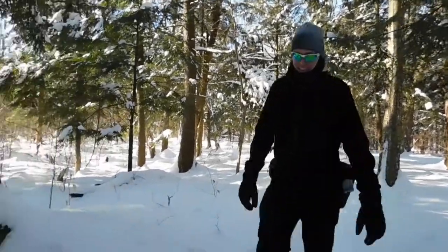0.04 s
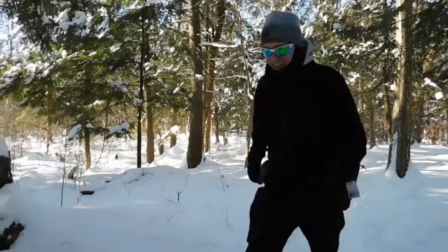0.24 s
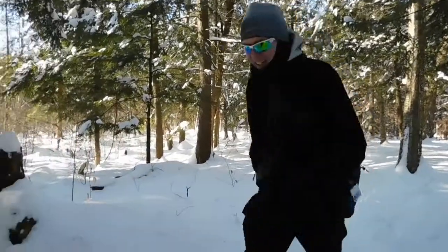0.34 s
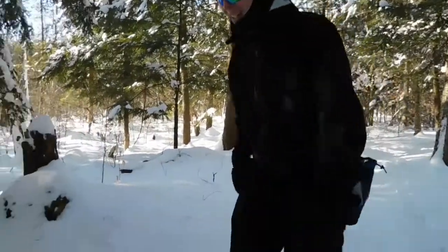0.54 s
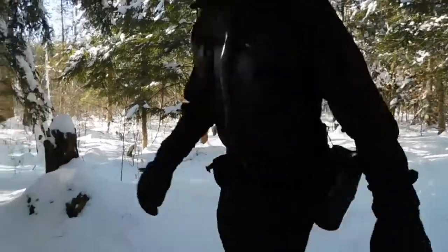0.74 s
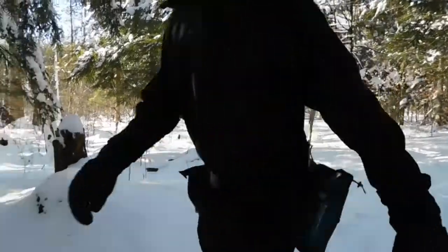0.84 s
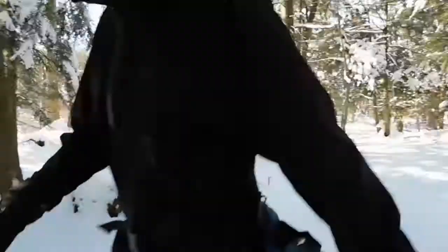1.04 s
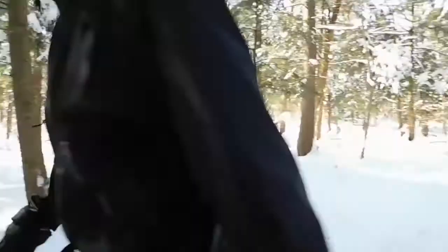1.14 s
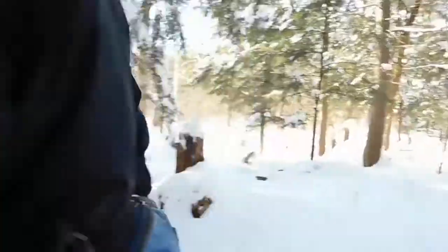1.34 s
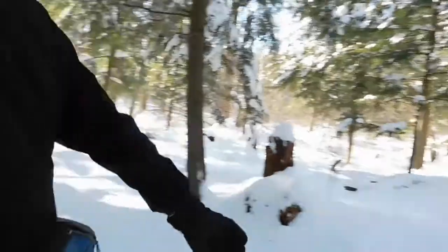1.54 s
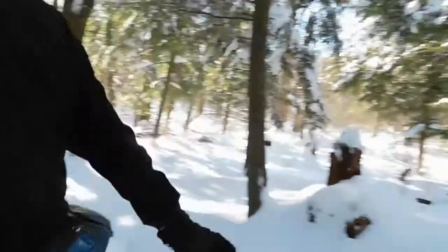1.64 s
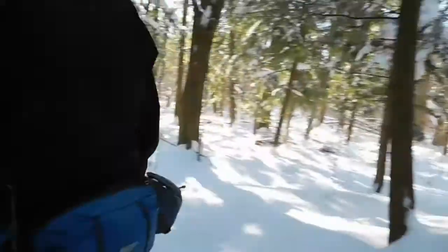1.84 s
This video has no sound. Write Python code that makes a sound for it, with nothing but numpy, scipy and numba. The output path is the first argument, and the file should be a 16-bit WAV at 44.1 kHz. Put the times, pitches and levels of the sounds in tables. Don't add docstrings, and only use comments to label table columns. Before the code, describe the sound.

Snow footsteps in a quiet outdoor forest, near and dry: dense icy crackle with hollow creaks, lumps cracking and crisp crust snaps, a brief pause between the first two bursts, then scattered crunching that fades away.

```python
import sys
import numpy as np
from scipy import signal
from scipy.fft import rfft, irfft
from scipy.io import wavfile
from scipy.ndimage import uniform_filter1d
from numba import njit

SR = 44100
rng = np.random.default_rng(int(sys.argv[2]) if len(sys.argv) > 2 else 0)


def waveform_to_disk(signal):
    frames = np.transpose(np.atleast_2d(signal))
    scaled = np.clip(frames, -1, 1) * 32767
    samples = np.round(scaled).astype(np.int16)
    wavfile.write(sys.argv[1], SR, samples)


def elevation(decibels):
    levels = np.asarray(decibels, float)
    return 10 ** (levels / 20)


N = 83790

# time in seconds, crush level in dB, brightness in dB.
PRESSURE_STEPS = [
    [(.2, -53, -5), (.262, -47, 3.5), (.272, -37, -1.5), (.335, -41, 5.5), (.352, -32.5, 5),
     (.39, -32.5, -0.5), (.402, -40, 1.5), (.435, -32.5, -0.5), (.488, -27, -8.5)],
    [(.498, -48, -1), (.66, -49.5, -5), (.78, -39, -1), (.8, -32, -7.5), (.862, -39, -10),
     (.875, -36.5, 3.5), (.95, -35, 2.5), (1.0, -36, 1.5)],
    [(1.03, -28.5, 0.5), (1.08, -32.5, 1), (1.09, -39.5, 2), (1.125, -38.5, 2.5), (1.143, -37, 2.5),
     (1.15, -46.5, 4), (1.22, -48.5, -1)],
    [(1.25, -45, -3), (1.38, -40.5, 1), (1.44, -40.5, 0.5), (1.455, -43, 5), (1.47, -35, 8.5),
     (1.53, -35.5, 4), (1.55, -29.5, 5.5), (1.62, -32.5, 3), (1.66, -41.5, 3)],
    [(1.69, -47.5, 4.5), (1.9, -48, -1)],
]
# start in seconds, peak in dB, pocket pitch in
# Hz, length in seconds, spray in dB.
SNOW_SLIPS = [(0.131, -56, 494, 0.0062, 0), (0.213, -16.5, 938, 0.008, -2), (0.238, -15, 1029, 0.011, 0),
              (0.263, -49, 468, .004, 0), (0.302, -17, 1360, 0.0065, -18), (0.38, -9.5, 942, .018, -11),
              (0.439, -20.5, 386, 0.015, 2), (0.69, -15.5, 993, 0.0058, 2), (0.7222, -12, 440, 0.012, 4),
              (0.762, -12, 420, 0.012, 1.5), (0.789, -25, 440, 0.0097, -4), (0.873, -28.5, 576, 0.0031, 7),
              (0.901, -23.5, 980, 0.0039, 11.5),
              (1.076, -20, 497, 0.0028, -14), (1.136, -24, 454, 0.007, 10.5),
                (1.159, -27, 820, 0.0023, 2.5), (1.183, -25.5, 404, 0.0081, 6.5),
                (1.2554, -26.5, 1070, 0.0015, -11), (1.299, -22.5, 524, 0.0012, 6),
                (1.3178, -25.5, 440, 0.001, 6), (1.3358, -22.5, 424, 0.0043, 3.5),
                (1.3541, -26, 434, 0.004, 4), (1.372, -26, 484, 0.0014, -12),
                (1.3952, -26.5, 354, 0.005, 10), (1.404, -18.5, 590, 0.013, -21),
                (1.424, -25.5, 440, 0.0028, 11), (1.459, -20.5, 505, 0.0023, 8.5),
                (1.541, -19.5, 844, 0.0043, 11), (1.5596, -15, 504, 0.0075, -18),
                (1.6296, -26, 920, 0.004, 13), (1.666, -22.5, 1560, 0.0091, 4),
                (1.699, -28, 920, 0.00057, -18), (1.783, -30.5, 650, 0.001, 2)]
SNAP_TIMES = [.3578, .358, .7225, .7325, .762, 1.4632, 1.4633, 1.4634, 1.4635, 1.542, 1.5795, 1.6305, 1.845]
# peak in dB, pitch in Hz, ringing in cycles.
SNAP_TONES = [(-15, 3990, 6.9), (-11, 7200, 1), (-24, 2500, 16), (-18, 11100, 3.5), (-23.5, 2380, 16),
              (-5, 6820, 6), (-13.5, 11000, 4.7), (-14, 4230, 6.1), (-11.5, 1800, 2.9), (-42, 5800, 2.),
              (-10.5, 11000, 1.4), (-15, 1890, 4.5), (-34, 680, 1.9)]
# time of the peak in seconds, peak in dB, pitch in Hz.
LUMPS = [(0.265, -33.5, 695), (0.2745, -34, 850), (0.283, -30, 1460), (0.3206, -37, 388), (0.342, -34, 880),
         (0.3513, -13, 1070), (.3579, -12.5, 980), (0.3924, -30, 960), (0.4121, -18, 1380),
         (0.4246, -24, 1190), (0.439, -19, 1270), (0.4449, -16.5, 930), (0.4499, -18.5, 990),
         (0.4605, -22, 360), (0.4728, -24, 980), (0.478, -31, 433), (0.4841, -18.5, 450),
         (0.4851, -19.5, 2380), (0.4906, -27, 417), (0.6605, -30, 2590), (.6802, -29, 1345),
         (0.8011, -24.5, 430), (0.8116, -17.5, 880), (0.8277, -18.5, 870), (0.8495, -20.5, 1000),
         (0.8716, -19, 1110), (0.88, -30, 530), (0.8973, -25.5, 315), (.908, -15.5, 1000),
         (0.9211, -20, 1470), (.9293, -20.5, 1140), (0.9408, -18.5, 1000), (0.9503, -20, 1200),
         (0.9567, -20, 850), (0.971, -26, 1130), (0.9837, -22.5, 1220), (0.9926, -22, 1110),
         (1.0148, -25.5, 486), (1.0235, -24, 2100), (1.0293, -20, 404), (1.0465, -17.5, 566),
         (1.0563, -25, 600), (1.0618, -17.5, 524), (1.0697, -14.5, 505), (1.0802, -21.5, 460),
         (1.1169, -25.5, 460), (1.1436, -27, 425), (1.1909, -25, 1590), (1.2565, -24, 1500),
         (1.2794, -24, 450), (1.4341, -21.5, 375), (1.4726, -22.5, 325), (1.4967, -20.5, 386),
         (1.5042, -21, 690), (1.5902, -22, 640), (1.6, -22, 454), (1.6063, -25, 1120), (1.617, -19, 460),
         (1.6318, -16.5, 880), (1.6469, -27, 450)]
# start in seconds, peak in dB, pitch in Hz.
SETTLING = [(.243, -41.5, 128), (0.313, -32.5, 168), (0.877, -33.5, 140), (0.919, -32.5, 170),
            (1.034, -35, 111), (1.083, -30, 200), (1.169, -35, 267), (1.395, -45, 150), (1.457, -28, 120),
            (1.479, -35.5, 220), (1.555, -41, 119), (0.359, -45.5, 121)]
# time in seconds, level in dB.
POWDER_FLOW = [(.46, -90), (.51, -55), (.6, -56.5), (.68, -54), (.8, -55), (.96, -81), (.985, -43),
               (1.03, -54), (1.1, -90)]
# frequency in Hz, grain level in dB.
CRUSH_COLOUR = [(60, -92), (200, -21), (430, -15.5), (650, -21.5), (1150, -16.5), (1700, -24.5),
                (2400, -27.5), (3300, -29), (14000, -36.5)]
# frequency in Hz, density in dB.
FOREST_COLOUR = [(15, -29), (25, -3), (60, -12), (220, -16.5), (1000, -25), (3000, -20), (4600, -27),
                 (16000, -23.5)]
# time in seconds, lag of the left port in samples, left minus right in dB.
WALKER_BEARING = [(0, 3.5, -4), (.5, 0.5, -1.3), (.95, 2.5, -2), (1.15, -1.5, -2.5), (1.3, -7.5, -2),
                  (1.9, -5.5, -3)]
# resonance in Hz, width in Hz, level in dB.
FOOTPRINT_HOLLOWS = [
    (440, 245, -7),
    (1070, 770, -8),
    (2370, 585, 1),
    (3240, 156, -2),
    (3980, 200, -2),
]

GRAINS_PER_S, GRAIN_CYCLES, GRAIN_SPREAD_DB = 18000, 1.88, 1
CRUSH_DB, CLUMP_DB = 4.5, 0.92
FINE_SHARE = .75
POCKET_CYCLES, POCKET_DB = 1.81, -17
SPRAY_DB, SPRAY_TILT_DB_PER_OCTAVE, SPRAY_ON_S = -14.5, 0.5, .004
LUMP_CYCLES, LUMP_DB, EDGE_DB, EDGE_HZ, CRUMB_DB = 2.36, -7, -19, 3700, -5.5
SNAP_TAIL_S, SNAP_TAIL_DB = .0025, -10.
POWDER_HZ, POWDER_OCTAVES, POWDER_CYCLES = 2300, 0.23, 5.6
THUD_CYCLES = 2
FOREST_DB, RUSTLE_RISE_DB_S = -55, 2
PASS_S, BEHIND_SHIFT = 1.05, 0.765
LAG_SCATTER_SAMPLES, TREBLE_LEFT_DB_PER_OCTAVE = 2.4, 2.5
MIC_LOW_HZ, TOP_HZ = 113.4, 15450


def col(table, k, x, log=False):
    a = np.array(table, float)
    if log:
        return np.interp(np.log(x), np.log(a[:, 0]), a[:, k])
    return np.interp(x, a[:, 0], a[:, k])


@njit
def rings(start, hz, cycles, size, n, sr):
    out = np.zeros(n)
    for g in range(len(start)):
        first = int(start[g]) + 1
        decay = 5 / cycles[g] * hz[g] / sr
        pole = 2j * np.pi * hz[g] / sr - decay
        z = size[g] * np.e * decay * np.exp(pole * (first - start[g]))
        turn = np.exp(pole)
        for k in range(first, min(n, first + int(9 / decay) + 2)):
            out[k] += z.imag * (k - start[g])
            z *= turn
    return out


def place(t, hz, cycles, db, scatter, aim=0.92):
    t, hz, cycles, db, scatter = [a.ravel() for a in np.broadcast_arrays(t, hz, cycles, db, scatter)]
    lag = aim * col(WALKER_BEARING, 1, t) * np.clip(hz / 1800, .4, 1)
    lag = lag + LAG_SCATTER_SAMPLES * scatter * np.minimum(1, (2500 / hz) ** .65)
    treble = np.clip(np.log2(hz / 700), -.2, 1.6)
    pan = col(WALKER_BEARING, 2, t) + TREBLE_LEFT_DB_PER_OCTAVE * treble
    hz = np.clip(hz, 30, .42 * SR)
    cycles = np.clip(cycles, .4, 30)
    ports = []
    for side in (1, -1):
        start = np.clip(t * SR + side * lag / 2, 0, N)
        ports.append(rings(start, hz, cycles, elevation(db + side * pan / 2), N, 1. * SR))
    return np.array(ports)


def unit_scatter(u):
    return np.sqrt(12) * (u - .5)


def walk(rate):
    k = int(SR / rate)
    held = np.repeat(rng.standard_normal(N // 20), k)[:N]
    return 1.3 * uniform_filter1d(uniform_filter1d(held, k), k)


def press(k, t):
    return col(sum(PRESSURE_STEPS, []), k, t)


def grain_db(hz, t, u):
    bright = press(2, t) * np.clip(np.log2(hz / 2500), 0, 1)
    larger = GRAIN_SPREAD_DB * np.minimum(-np.log(1 - u), 4)
    return col(CRUSH_COLOUR, 1, hz, True) + 20 * np.log10(hz / 500) + bright + larger


def forest():
    f = np.arange(N // 2 + 1) * SR / N + 1
    mid, side = rfft(rng.standard_normal((2, N))) * elevation(col(FOREST_COLOUR, 1, f, True))
    side = side * np.clip(0.24 + f / 1600.0, 0, 1)
    x = irfft(np.array([mid + side, mid - side]), N)
    level = FOREST_DB + RUSTLE_RISE_DB_S * np.arange(N) / SR + .4 * walk(42.5)
    return x / x.std() * elevation(level)


def crush():
    when, pitch, size, spread = rng.random((4, int(GRAINS_PER_S * N / SR)))
    t = when * N / SR
    hz = 130 * 124 ** pitch ** FINE_SHARE
    clump = CLUMP_DB * walk(320)[(t * SR).astype(int)] * np.clip(3000 / hz, 0, 1)
    db = press(1, t) + grain_db(hz, t, size) + clump + CRUSH_DB
    return place(t, hz, GRAIN_CYCLES, db, unit_scatter(spread))


def slips():
    start, peak, pocket_hz, length, spray = np.array(SNOW_SLIPS, float).T[:, :, None]
    turn = np.round(length * pocket_hz * np.arange(6) / 6) / pocket_hz
    knock = place(start + turn, pocket_hz, POCKET_CYCLES, peak + POCKET_DB, 0)
    when, pitch, size, spread = rng.random((4, len(start), 80))
    t = start + (length + SPRAY_ON_S) * when ** 1.3
    hz = 300 * 50 ** pitch
    tilt = SPRAY_TILT_DB_PER_OCTAVE * np.log2(hz / 1000)
    db = peak + spray + SPRAY_DB + grain_db(hz, t, size) + tilt
    return knock + place(t, hz, GRAIN_CYCLES, db, unit_scatter(spread))


def thuds():
    t, db, hz = np.array(SETTLING, float).T
    return place(t, hz, THUD_CYCLES, db, 0)


def ticks():
    peak_s, db, hz = np.array(LUMPS, float).T
    knock = place(peak_s - LUMP_CYCLES / 5 / hz, hz, LUMP_CYCLES, db + LUMP_DB, 0)
    edge = place(peak_s - 0.3 / hz, EDGE_HZ, 0.66, db + LUMP_DB + EDGE_DB, 0)
    when, pitch, size, spread = rng.random((4, len(peak_s), 16))
    t = peak_s[:, None] + SPRAY_ON_S * (when - .2)
    fine_hz = 600 * 25 ** pitch
    crumb_db = db[:, None] + CRUMB_DB + grain_db(fine_hz, t, size)
    crumbs = place(t, fine_hz, GRAIN_CYCLES, crumb_db, unit_scatter(spread))
    return knock + edge + crumbs


def snaps():
    t = np.array(SNAP_TIMES)
    db, hz, cycles = np.array(SNAP_TONES, float).T
    crack = place(t, hz, cycles, db, 0, aim=0.095)
    when, pitch, spread = rng.random((3, len(t), 12))
    splinter_s = t[:, None] + SNAP_TAIL_S * 3 * when
    splinter_hz = hz[:, None] * 2 ** (3.4 * pitch - .7)
    splinter_db = db[:, None] + SNAP_TAIL_DB - 18 * when
    return crack + place(splinter_s, splinter_hz, 1.0, splinter_db, unit_scatter(spread))


def powder():
    pitch, scatter = rng.standard_normal((2, 4000))
    begin, end = POWDER_FLOW[0][0], POWDER_FLOW[-1][0]
    t = begin + (end - begin) * rng.random(4000)
    hz = POWDER_HZ * 2 ** (POWDER_OCTAVES * pitch)
    return place(t, hz, POWDER_CYCLES, col(POWDER_FLOW, 1, t), scatter)


def hollows(x, shift):
    out = x
    for hz, width, db in FOOTPRINT_HOLLOWS:
        centre = hz * (shift if hz > 2000 else 1)
        b, a = signal.iirpeak(centre, hz / width, SR)
        out = out + elevation(db) * signal.lfilter(b, a, x)
    return out


def scene():
    snow = crush() + slips() + ticks()
    passed = np.clip((np.arange(N) / SR - PASS_S) * 20, 0, 1)
    snow = (1 - passed) * hollows(snow, 1.0) + passed * hollows(snow, BEHIND_SHIFT)
    walker = snow + snaps() + powder() + thuds()
    low_cut = signal.butter(3, MIC_LOW_HZ, "high", fs=SR, output="sos")
    return signal.sosfilt(low_cut, walker) + forest()


def roll_off(x):
    return signal.sosfilt(signal.butter(12, 16660, fs=SR, output="sos"), x)


def record(dry):
    top_cut = signal.ellip(8, .2, 60, TOP_HZ, fs=SR, output="sos")
    mix = signal.sosfilt(top_cut, dry)
    return roll_off(mix)


dry = scene()
out = record(dry)
waveform_to_disk(out)
```